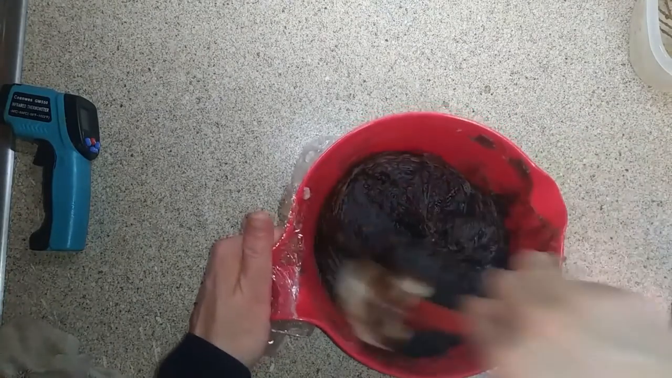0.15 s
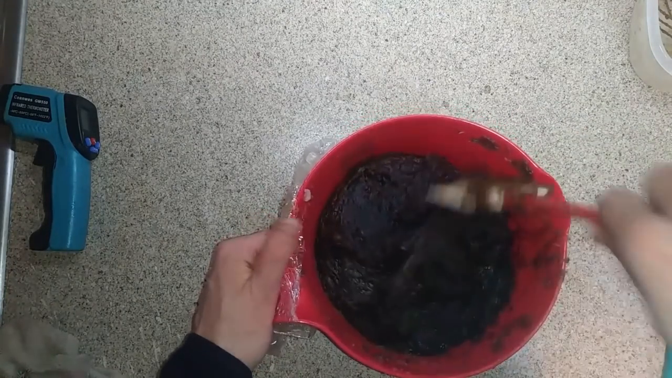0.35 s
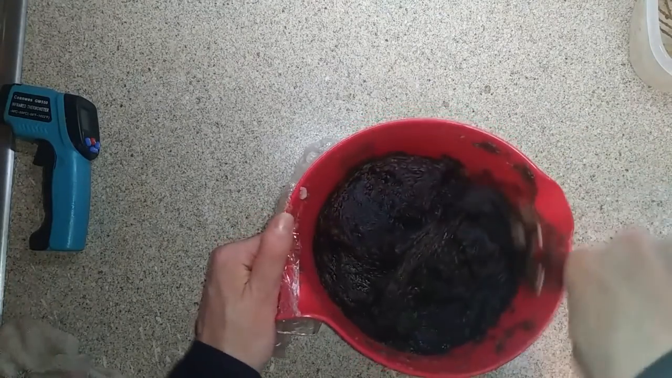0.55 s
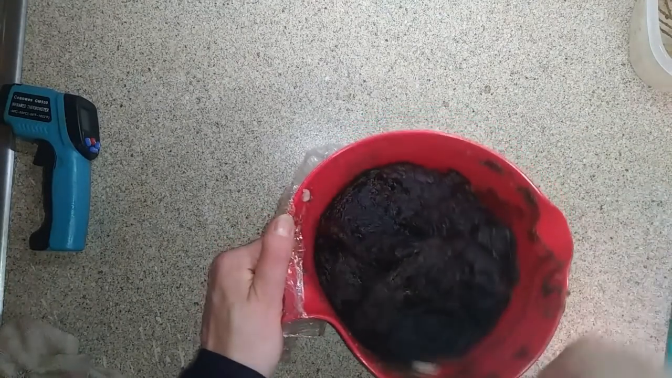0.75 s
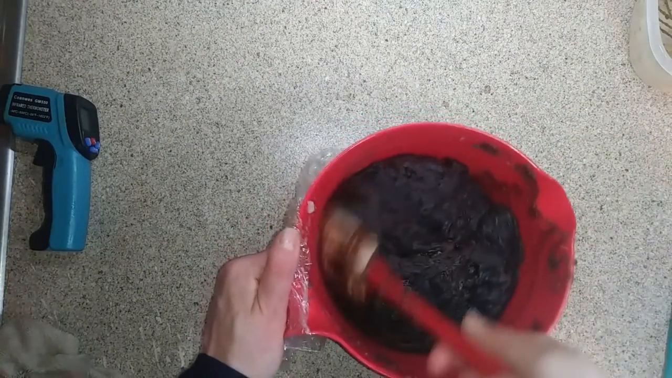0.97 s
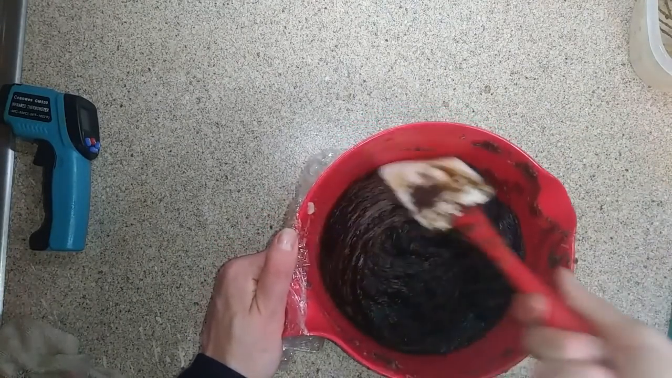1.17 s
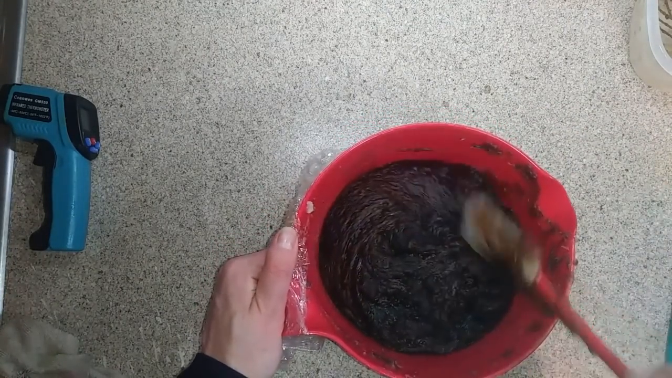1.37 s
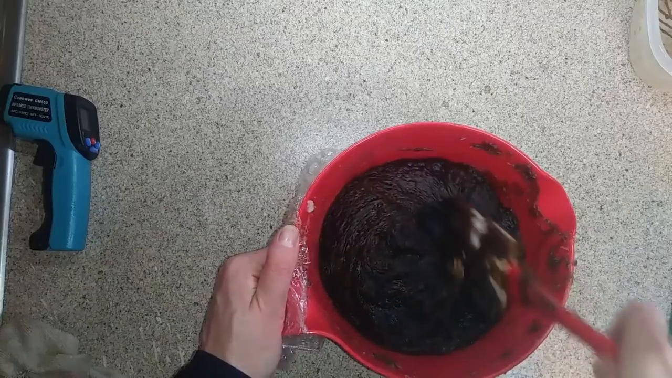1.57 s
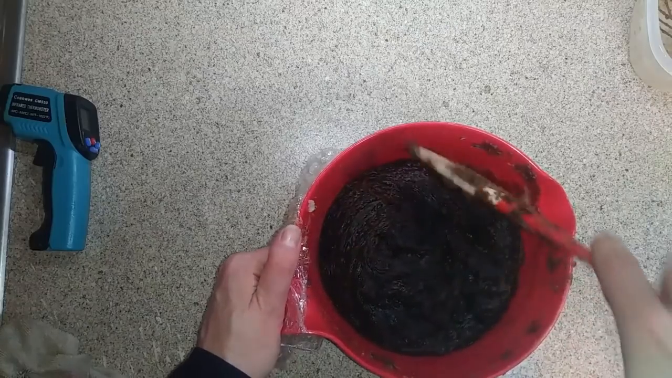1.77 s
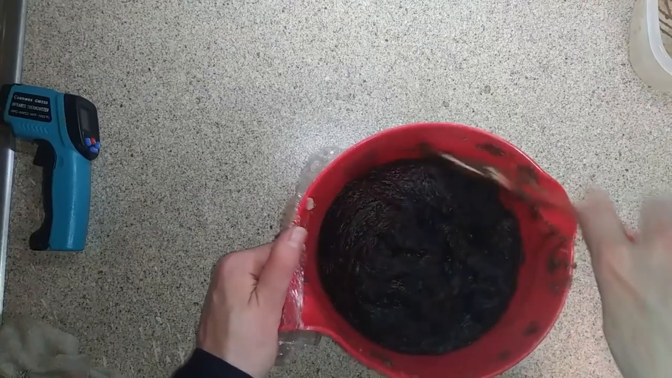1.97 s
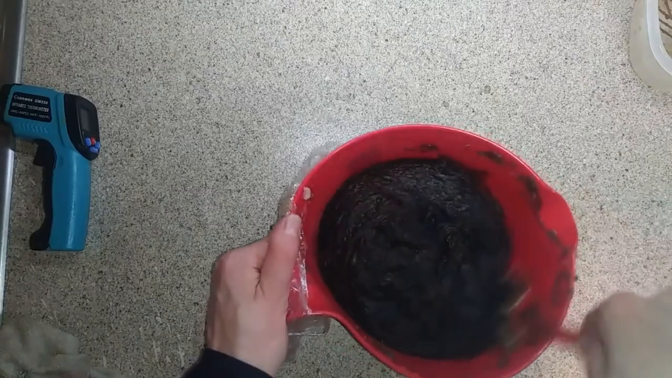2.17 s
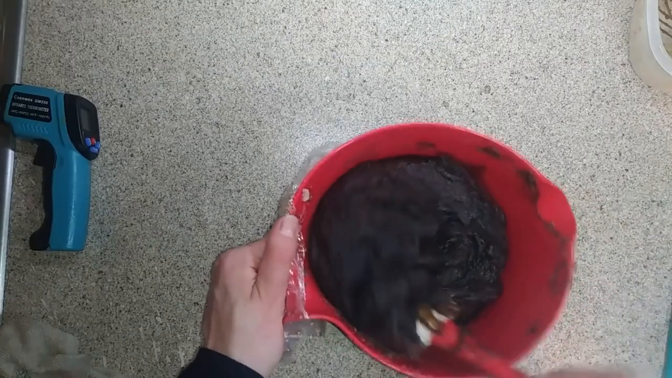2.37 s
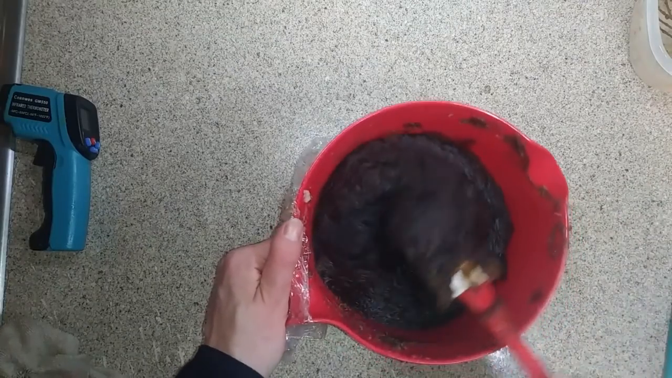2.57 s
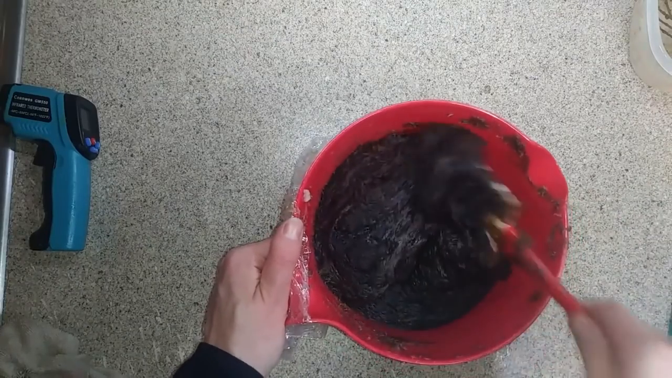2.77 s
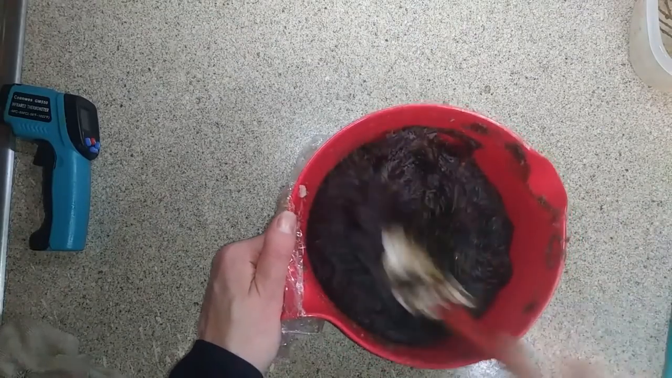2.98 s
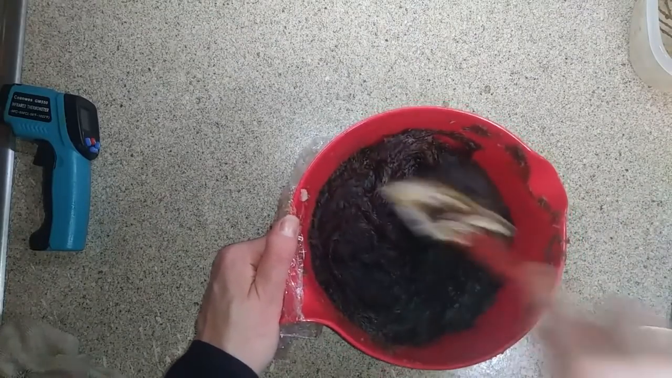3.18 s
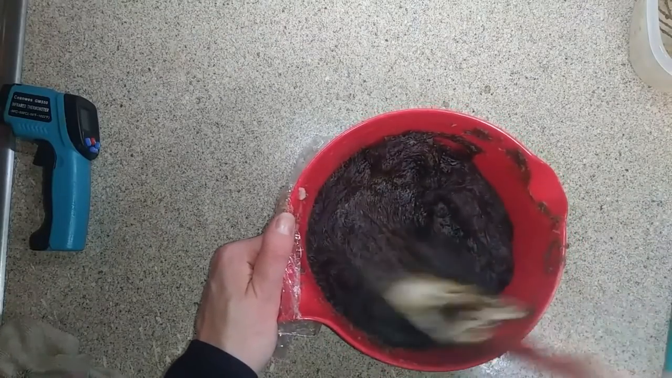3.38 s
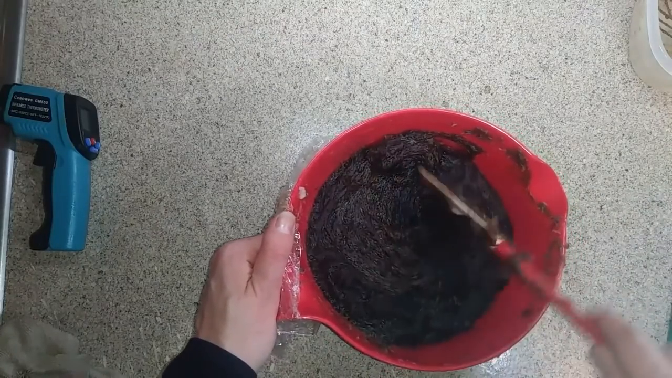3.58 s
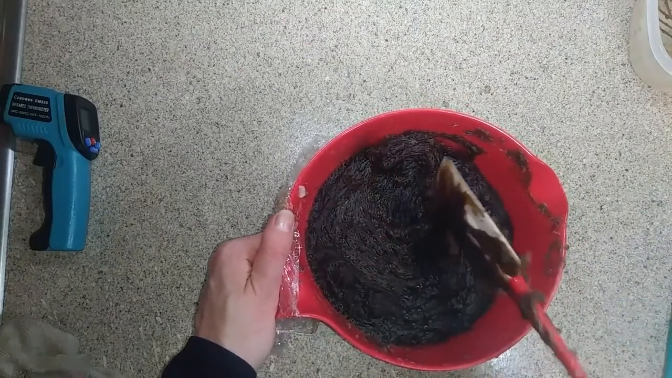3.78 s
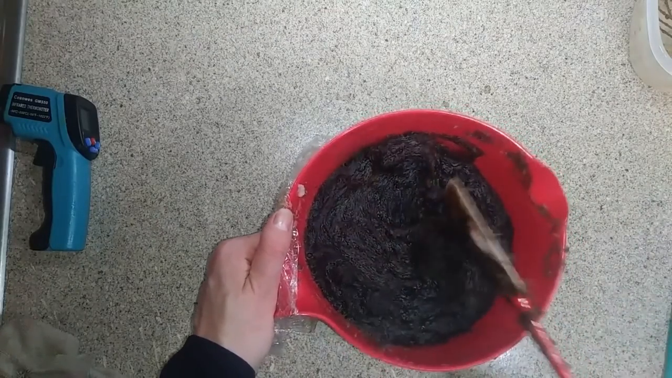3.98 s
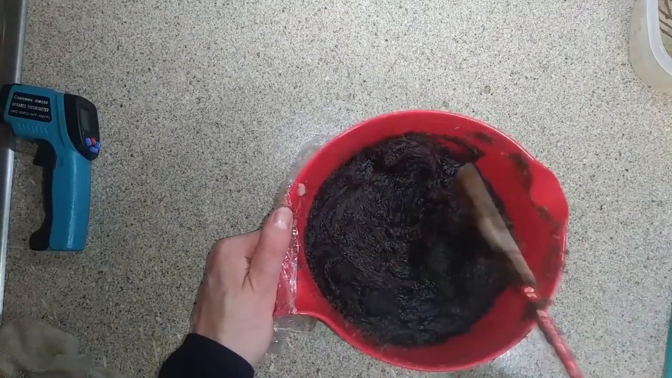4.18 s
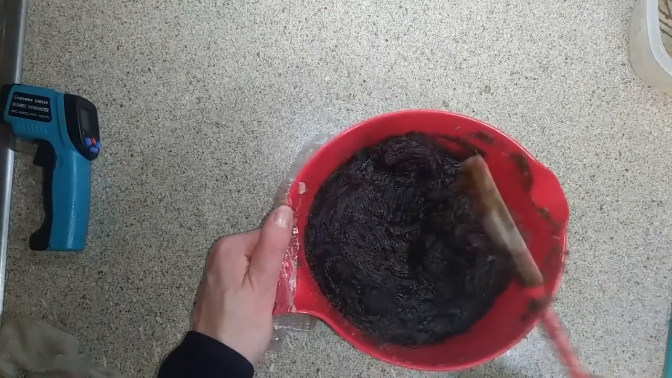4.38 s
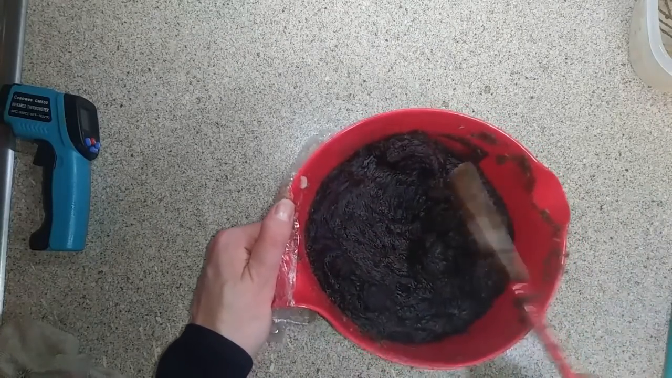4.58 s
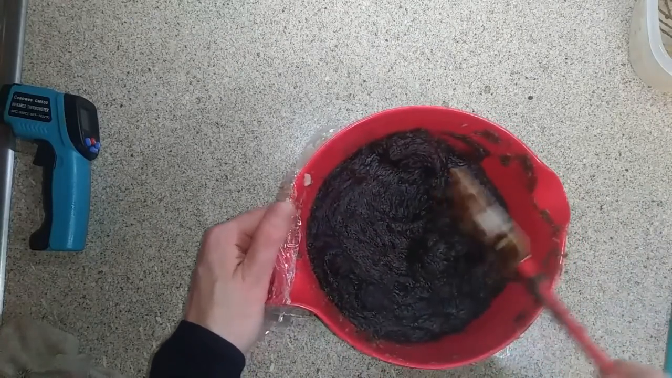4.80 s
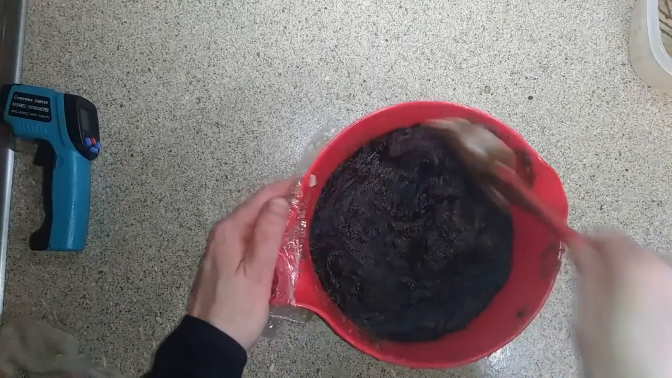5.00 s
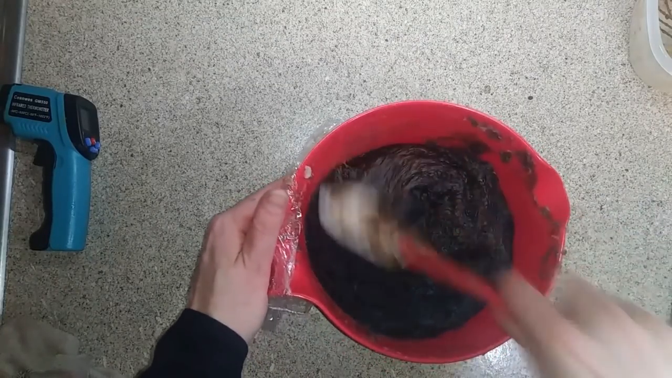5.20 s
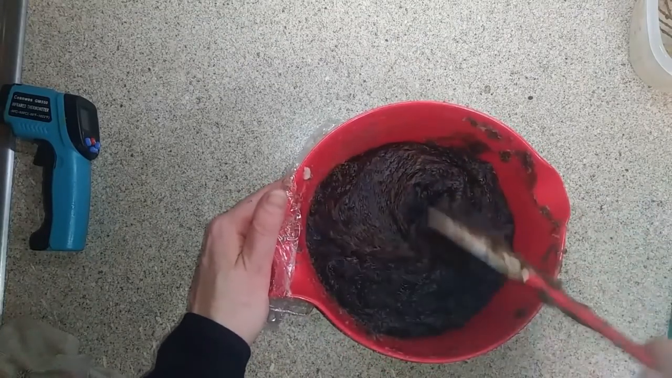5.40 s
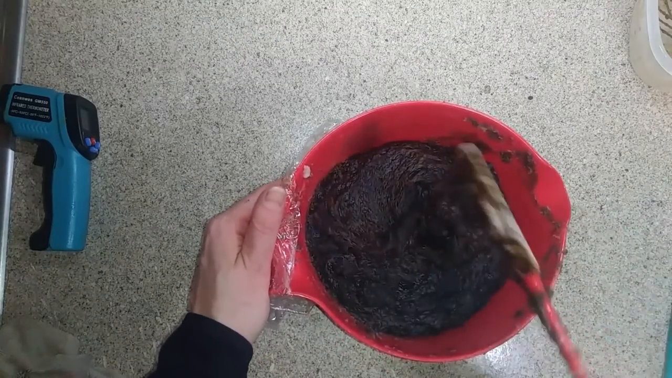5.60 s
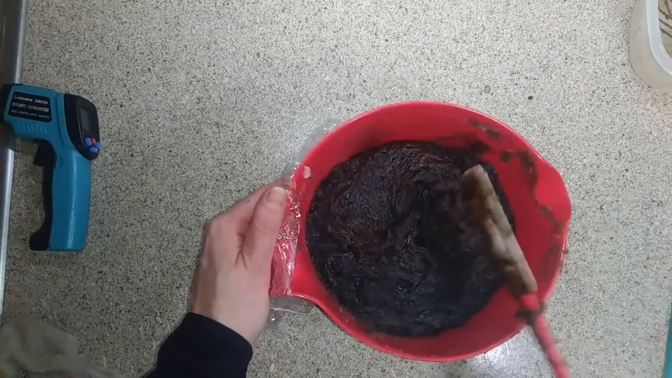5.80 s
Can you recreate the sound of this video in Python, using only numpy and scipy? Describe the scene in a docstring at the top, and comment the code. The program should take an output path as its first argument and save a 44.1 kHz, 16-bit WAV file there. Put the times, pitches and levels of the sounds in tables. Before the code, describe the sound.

In a small quiet kitchen, closely miked, a silicone spatula works thick soap batter in a plastic bowl. From 0 to 4 seconds come irregular strokes: low, hollow churning, mid-pitched dragging along the wall, wet smearing with fine crackles and tiny popping bubbles, and faint low rumbles as the bowl shifts. A quick scrape with a dull bump comes near 2.15 and a firmer soft knock at 2.54, followed by gentler strokes. From 4.05 to 4.73 the bowl is rapped on the counter five times, about 0.17 seconds apart, far louder than the stirring: a sharp plastic crack, short hollow clatter and a deep counter boom with a quick rebound. Sticky crackling swells as batter slumps until about 4.9. Stirring resumes from 4.97 to 5.8 with wet snaps, and one final loud rap lands at 5.8. Short room reflections and faint steady air surround everything.

```python
"""Thick soap batter churns, smears and crackles wetly as a silicone spatula folds it in a plastic bowl,
close to the microphone in a small kitchen. The bowl is then rapped on the counter five times to settle it,
stirred again and rapped once more. Each rap is a filtered pulse for the crack, damped modes for the bowl
and slower low modes for the booming counter; the batter is random ruptures shaped by filters.
Noise with a decaying spectrum makes the room's reflections, and steady coloured noise its air."""
import sys
import numpy as np
from scipy import signal
from scipy.fft import rfft, irfft
from scipy.io import wavfile
from scipy.ndimage import uniform_filter1d, minimum_filter1d

SR = 44100
rng = np.random.default_rng(int(sys.argv[2]) if len(sys.argv) > 2 else 0)


def wav_record(signal):
    """Record a signal, one row per channel, as 16-bit PCM in the file named by sys.argv[1]."""
    frames = np.transpose(np.atleast_2d(signal))
    bounded = np.clip(frames, -1, 1)
    # unit amplitude maps onto the largest positive 16-bit level
    quanta = np.round(bounded * 32767).astype(np.int16)
    wavfile.write(sys.argv[1], SR, quanta)


N = 257984
TIME = np.arange(N) / SR
AFTER = np.arange(SR // 2) / SR  # seconds since a blow


def amp(db):
    """Level law: decibels to an amplitude factor."""
    return 10 ** (np.asarray(db) / 20)


def unit(x):
    """Normalisation by mean power: scales to rms 1."""
    return x / np.sqrt(np.mean(x ** 2) + 1e-20)


def read(points, hz):
    """Interpolation on a logarithmic frequency axis between the rows of a table."""
    point_hz, value = np.transpose(points)
    return np.interp(np.log(hz + 1), np.log(point_hz + 1), value)


def add(mix, start_s, sound):
    """Superposition: sums a sound into the mix from its start time."""
    part = mix[max(round(start_s * SR), 0):][:len(sound)]
    part += sound[:len(part)]


def colour(x, spectrum):
    """Spectral weighting: multiplies the spectrum of x by a gain curve, at rms 1."""
    gain = amp(read(spectrum, np.fft.rfftfreq(len(x), 1 / SR)))
    return unit(irfft(rfft(x) * gain, len(x)))


def noise(spectrum, t):
    """Coloured random noise as long as t: white noise under spectral weighting."""
    return colour(rng.standard_normal(len(t)), spectrum)


def dying(t60):
    """Exponential decay: the amplitude falls by 60 dB in t60 seconds."""
    return np.exp(-np.log(1000) * AFTER / t60)


def click(spectrum):
    """Minimum-phase impulse response: the most compact causal pulse with this spectrum, peak 1."""
    hz = abs(np.fft.fftfreq(len(AFTER), 1 / SR))
    log_gain = np.log(amp(read(spectrum, hz)))
    # the Hilbert transform of the log gain gives the phase
    pulse = np.fft.ifft(np.exp(np.conj(signal.hilbert(log_gain)))).real
    return pulse / abs(pulse).max()


def filtered(x, spectrum):
    """Convolution with the causal pulse of a spectrum."""
    return signal.fftconvolve(x, click(spectrum))[:len(x)]


def puff(spectrum, t60):
    """Decaying noise burst: filtered noise that starts near rms 1 and dies exponentially."""
    burst = rng.standard_normal(len(AFTER)) * dying(t60)
    return filtered(burst, spectrum) / np.linalg.norm(click(spectrum))


def grains(per_s, spread_db):
    """Poisson-like ruptures: sparse random impulses of either sign, most small and a few large."""
    size = amp(spread_db * np.minimum(rng.exponential(1, N), 4))
    sign = rng.choice([-1, 1], N)
    return size * sign * (rng.random(N) < per_s / SR)


def room_tail(rise_s=0.0017):
    """Diffuse reverberation: reflections build up quickly, then each band dies at its own speed."""
    # Decay of the room. Each row: frequency in Hz, t60 in seconds.
    room_decay = [(100, 0.6), (500, 0.23), (1500, 0.3), (5000, 0.25), (14000, 0.17)]
    hz, t, bands = signal.stft(rng.standard_normal(len(AFTER)), SR, nperseg=256)
    bands = bands * np.exp(-np.log(1000) * t / read(room_decay, hz)[:, None])
    tail = signal.istft(bands, SR)[1][:len(AFTER)]
    return tail * (1 - np.exp(-AFTER / rise_s))


def in_kitchen(x, wet_db):
    """Direct sound plus reverberation: convolves x with a tail of unit energy and adds it at wet_db."""
    tail = room_tail()
    return x + amp(wet_db) * signal.fftconvolve(x, tail / np.linalg.norm(tail))[:N]


def raps(crack_db=-9.5, clatter_db=-20.5, clatter_t60=0.07, room_db=-44, change=0.48):
    """Impact excitation: landing on the same spot drives the same modes, so raps share much fine ring."""
    # The bowl lands on the counter. Each row: time in seconds, force in dB, hardness of the contact in dB,
    # weight of the boom in dB, seconds until the load rebounds; levels add to the other settings.
    landings = [(4.0480, 4, 0, -0.7, 0.021), (4.2124, 4, -1.5, 0.5, 0.024), (4.3911, 3.5, -1, -0.4, 0.024),
                (4.5625, 3.5, 3, 1, 0.028), (4.7297, 2.5, 0.5, -2.5, 0.0245), (5.7956, 3, 1, 0.5, 0.029)]
    # Pulses of one rap: a faint one leads, then the base strikes and chatters.
    # Each row: seconds relative to the strike, relative level in dB.
    contacts = [(-.0007, -18), (0, 0), (.0066, -12)]
    # Boom of the counter under landing and rebound. Each row: frequency in Hz, relative level in dB,
    # t60 in seconds.
    landing_modes = [(114.3, 4, 0.077), (197.8, -6.5, 0.13), (62.2, -35, 0.79)]
    rebound_modes = [(101.2, -1, 0.14), (192, -5.5, 0.037), (76.5, -28.5, 0.65)]
    # Colours of one pulse, of the dense high modes and of the room's answer.
    # Each row: frequency in Hz, relative spectral level in dB.
    crack_colour = [(300, -25), (1500, -12), (2500, -1), (3400, -11), (4400, 0), (5600, 0), (6400, -15),
                    (8500, -31), (16000, -47)]
    clatter_colour = [(150, 9), (400, -5), (1500, 6.5), (2100, -0.5), (2700, -5), (3500, -6), (4200, -0.5),
                      (5700, -4.5), (6500, -7.5), (7300, -14.5), (8400, -23.5), (16000, -47.5)]
    room_colour = [(35, -32), (70, -20), (120, 15.5), (250, -5.5), (500, 8.5), (1600, -3.5), (2300, -6),
                   (3400, -10), (5000, -13), (6500, -16), (8500, -34), (16000, -42.5)]
    out, crack = np.zeros(N), click(crack_colour)
    same_clatter, same_room = puff(clatter_colour, clatter_t60), room_tail()
    for start_s, force_db, hard_db, weight_db, rebound_s in landings:
        for delay_s, db in contacts:
            add(out, start_s + delay_s, -amp(force_db + hard_db + crack_db + db) * crack)
        clatter = same_clatter + change * puff(clatter_colour, clatter_t60)
        clatter = amp(clatter_db + hard_db) * clatter
        room = amp(room_db) * unit(filtered(same_room + change * room_tail(), room_colour))
        add(out, start_s, amp(force_db) * (bowl_ring() + clatter + room))
        add(out, start_s, amp(weight_db) * boom(landing_modes))
        add(out, start_s + rebound_s, amp(weight_db) * boom(rebound_modes))
    return out


def bowl_ring(spread_s=0.0017, contact_hz=6500):
    """Bending waves: the base moves at once and the wall follows; the contact's low-pass rounds the onset."""
    # Modes of the filled bowl on the counter, and of its flat base, which the batter damps almost at once.
    # Each row: frequency in Hz, relative level in dB, t60 in seconds.
    bowl_modes = [(285.2, -38.5, 0.33), (336, -43, 0.3), (386, -22, 0.13), (442.7, -34, 0.18),
                  (503, -46, 0.12), (633.6, -11, 0.044), (655, -37.5, 0.44), (740, -21, 0.11),
                  (786, -28, 0.094), (843.3, -18, 0.081), (877, -28, 0.16), (1035, -30.5, 0.14),
                  (1103, -4, 0.0076), (1120, -42, 0.21), (1280, -48, 0.28), (1270, -35, 0.16),
                  (1480, -53, 0.77), (1487, -27.5, 0.093), (1561, -17.5, 0.056), (1687, -31.5, 0.16),
                  (1800, -14.5, 0.029), (2015, -32, 0.093), (2147, -51, 0.13), (2255, -27.5, 0.038),
                  (2630, -53, 0.2)]
    base_modes = [(392, -12, 0.043), (850.7, -10.5, 0.048), (1513, -8, 0.0071)]
    wall = ringing(bowl_modes) * (1 - np.exp(-AFTER / spread_s))
    ring = wall - ringing(base_modes)
    return signal.sosfilt(signal.butter(6, contact_hz, fs=SR, output="sos"), ring)


def ringing(modes, detune=0.0021, vary_db=0.5):
    """Modal superposition: neighbours swing in opposite sense; the shifting batter retunes them a little."""
    ring = 0
    changes = rng.standard_normal((len(modes), 2))
    for k, ((hz, db, t60), (pitch, level)) in enumerate(zip(modes, changes)):
        swing = np.sin(2 * np.pi * hz * (1 + detune * pitch) * AFTER)
        ring = ring + (-1) ** k * amp(db + vary_db * level) * swing * dying(t60)
    return ring


def boom(modes, rise_s=0.023):
    """Slow excitation of heavy low modes: they swell under a soft downward push and die away."""
    swings = sum(amp(db) * np.sin(2 * np.pi * hz * AFTER) * dying(t60) for hz, db, t60 in modes)
    return -(1 - np.exp(-AFTER / rise_s)) * swings


def stirring(pressure, depth, drag_db=-3, churn_db=-1, shake_db=-5, nudge_db=-1,
             cavity_hz=345, cavity_width_hz=75):
    """Stick-slip and cavity resonance: the blade drags, churns a hollow in the batter and shakes the bowl."""
    # Colours of the drag along the wall and of the shaken bowl.
    # Each row: frequency in Hz, relative spectral level in dB.
    drag_colour = [(300, 0.5), (550, 3.5), (1000, 5), (1700, 0.5), (2200, 4), (2900, -9.5), (4500, -24),
                   (8000, -27)]
    shake_colour = [(25, -49.5), (55, -6.5), (95, 3), (130, 2), (200, -9.5), (300, -28), (600, -67)]
    drag = amp(drag_db) * pressure * colour(grains(per_s=1500, spread_db=3.5), drag_colour)
    hollow = signal.iirpeak(cavity_hz, cavity_hz / cavity_width_hz, SR)
    folds = signal.lfilter(*hollow, grains(per_s=600, spread_db=4.5))
    dull_folds = signal.lfilter(*signal.butter(2, 900, fs=SR), folds)
    churn = amp(churn_db) * depth * unit(dull_folds)
    motion = amp(shake_db) * pressure + amp(nudge_db) * nudges()
    return in_kitchen(drag + churn, wet_db=-5) + motion * noise(shake_colour, TIME)


def strokes():
    """Amplitude envelopes of smear, drag and churning over all strokes; they are zero between strokes."""
    # Strokes of the spatula. Each row: start in seconds, length in seconds, then relative levels in dB of
    # the wet smear, the drag along the wall and the churning of the mass.
    stroke_list = [(0.0, .33, -61.5, -59, -55.5), (0.357, 0.17, -64.5, -66, -62.5),
                   (.56, 0.3, -63, -59, -64), (.89, .22, -61.5, -57, -67.5), (1.12, .11, -73, -60.5, -62.5),
                   (1.276, 0.8, -74.5, -61, -69.5), (2.11, 0.047, -55, -55, -59.5),
                   (2.216, 0.32, -66, -57, -67), (2.542, 0.71, -70.5, -58.5, -57.5),
                   (3.326, 0.049, -62, -54, -56.5), (3.41, 0.49, -76, -62, -66),
                   (3.879, 0.019, -63, -55.5, -74), (3.964, 0.014, -54.5, -53.5, -59),
                   (4.965, 0.26, -59.5, -58, -66.5), (5.272, .25, -64.5, -68, -68.5),
                   (5.555, 0.31, -65.5, -62, -58)]
    return sum(amp(levels_db)[:, None] * press(start_s, length_s)
               for start_s, length_s, *levels_db in stroke_list)


def press(start_s, length_s, press_s=0.016, ease_s=0.043):
    """Linear attack and release: the gain of one push as the blade presses in, holds and eases off."""
    t = TIME - start_s
    attack = np.clip(t / press_s, 0, 1)
    release = np.clip(1 - (t - length_s) / ease_s, 0, 1)
    return attack * release


def nudges():
    """Half-sine envelopes: each shift of the bowl on the counter swells and fades in one arch."""
    # Each row: start in seconds, length in seconds, relative level in dB.
    shifts = [(0.022, 0.07, -49.5), (0.154, 0.087, -50), (0.728, 0.2, -53), (0.944, .1, -61),
              (1.98, 0.064, -53), (2.44, 0.13, -46.5), (2.52, .15, -53.5), (4.96, 0.3, -58)]
    return sum(amp(db) * np.sin(np.pi * np.clip((TIME - start_s) / length_s, 0, 1))
               for start_s, length_s, db in shifts)


def smear(wetness, stir_db=4):
    """Film rupture: thin wet films tear behind the blade, and off the wall as the batter slumps."""
    # Each row: frequency in Hz, relative spectral level in dB.
    smear_colour = [(800, -0.5), (2000, -1), (3200, -5.5), (4300, 0), (5500, 1), (6800, -1.5),
                    (8300, -17.5), (11000, -17), (15500, -27)]
    level = amp(stir_db) * wetness + slump()
    tears = colour(grains(per_s=1600, spread_db=3.5), smear_colour)
    return in_kitchen(level * tears, wet_db=-4)


def slump(start_s=4.58, end_s=4.92, end_db=-52, growth_db_per_s=30):
    """Exponential growth: batter peels from the wall ever more strongly, then comes to rest."""
    growth_db = growth_db_per_s * np.minimum(TIME - end_s, 0)
    return press(start_s, end_s - start_s) * amp(end_db + growth_db)


def bubbles(wetness, level_db=-5, t60=0.044):
    """Shot noise: tiny bubbles burst at random wherever the batter smears or slumps."""
    # Each row: frequency in Hz, relative spectral level in dB.
    bubble_colour = [(500, -11.5), (2500, 1.5), (6000, 5), (8500, -12.5), (15000, -12.5)]
    bursts = signal.fftconvolve(grains(per_s=45, spread_db=3), puff(bubble_colour, t60))[:N]
    return in_kitchen(amp(level_db) * wetness * unit(bursts), wet_db=-11)


def short_bursts(t60=0.015, dull_hz=7200, dull_db=-10, skirt_db=-30):
    """Band-limited noise: each burst puffs around its own pitch; soft batter damps the highest treble."""
    # Short bursts: snapping air pockets, the blade's quick scrape near 2.15 s and a soft bump at 1.185 s.
    # Each row: time in seconds, level in dB, centre in Hz, width in octaves.
    burst_list = [(0.211, -38, 5100, 0.3), (0.326, -42.5, 1960, 0.44), (.472, -45.5, 5500, 0.5),
                  (0.6383, -39.5, 5600, 0.81), (0.898, -42, 5270, 0.94), (0.945, -45.5, 7000, 1.1),
                  (1.038, -34, 4970, 1.8), (1.0845, -42, 5500, 1.2), (1.185, -39.5, 900, 2.2),
                  (1.217, -42.5, 6000, 0.73), (1.245, -46.5, 4000, 0.45), (1.412, -44.5, 5900, 0.59),
                  (2.151, -44, 1700, 0.75), (2.159, -38, 1490, 1.06), (3.978, -41, 5000, 4.1),
                  (4.5914, -27, 4570, 0.76), (4.7123, -34.5, 11000, 2.7), (4.853, -39, 5300, 0.71),
                  (5.05, -35.5, 2260, 0.53), (5.134, -40.5, 6700, 2), (5.187, -40.5, 5930, 0.45)]
    out, hz = np.zeros(N), np.geomspace(60, 16000, 60)
    damping_db = dull_db * np.clip((hz - dull_hz) / 1200, 0, 1)
    for start_s, db, centre_hz, octaves in burst_list:
        distance = np.log2(hz / centre_hz)  # octaves from the centre
        peak_db = -6 * (distance / octaves) ** 2
        shape_db = np.maximum(peak_db, skirt_db - 3 * abs(distance)) + damping_db
        add(out, start_s, amp(db) * puff(np.c_[hz, shape_db], t60))
    return in_kitchen(out, wet_db=-4.5)


def bumps(push_db=10, push_s=.0015):
    """Damped soft impact: silicone knocks dully on plastic, with one push and a short shudder."""
    # The blade bumps the wall through the batter. Each row: time in seconds, shudder level in dB,
    # t60 in seconds.
    knocks = [(2.154, -44.5, 0.048), (2.5395, -31.5, 0.039)]
    # Each row: frequency in Hz, relative spectral level in dB.
    bump_colour = [(60, -16), (250, 1.5), (600, -10), (950, 3.5), (1150, -0.5), (1600, -13.5), (2600, -26),
                   (5000, -42), (16000, -66)]
    out = np.zeros(N)
    for start_s, db, t60 in knocks:
        add(out, start_s, amp(db) * puff(bump_colour, t60))
        add(out, start_s + push_s, -amp(db + push_db) * click(bump_colour))
    return in_kitchen(out, wet_db=-10.0)


def kitchen_air(level_db=-57.5):
    """Stationary noise: the quiet kitchen as steady coloured noise."""
    # Each row: frequency in Hz, relative spectral level in dB.
    air_colour = [(18, -22.5), (30, -4.5), (120, 1.5), (192, -5.5), (315, -5.5), (399, -10.5), (656, -7.5),
                  (1260, -14), (2240, -13.5), (2830, -17), (4190, -18), (4660, -10.5), (6890, -23),
                  (8060, -28), (15500, -34.5)]
    return amp(level_db) * noise(air_colour, TIME)


def scene():
    """Superposition at one microphone, the same in both channels."""
    wetness, pressure, depth = strokes()
    blows = raps() + short_bursts() + bumps()
    batter = smear(wetness) + bubbles(wetness + slump()) + stirring(pressure, depth)
    mono = blows + batter + kitchen_air()
    return np.array([mono, mono])


def record(dry, low_hz=40, ceiling=.89, edge_hz=15950):
    """Band limiting and peak control: low cut, look-ahead limiter, short closing fade and treble limit."""
    wide = signal.sosfilt(signal.butter(5, low_hz, "high", fs=SR, output="sos"), dry)
    headroom = ceiling / np.maximum(abs(wide).max(axis=0), ceiling)
    # the lowest gain nearby, smoothed, so that the gain falls ahead of each peak
    held = wide * uniform_filter1d(minimum_filter1d(headroom, size=61), size=61)
    held = held * np.minimum((TIME[-1] - TIME) / .003, 1)
    treble_limit = signal.firwin(511, edge_hz, window=("kaiser", 9), fs=SR)
    return signal.filtfilt(treble_limit, 1, held)


dry = scene()
out = record(dry)
wav_record(out)
```